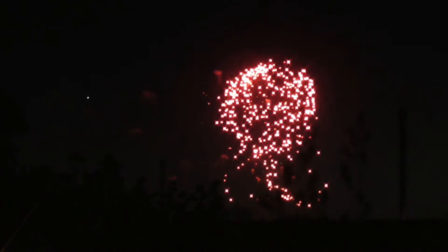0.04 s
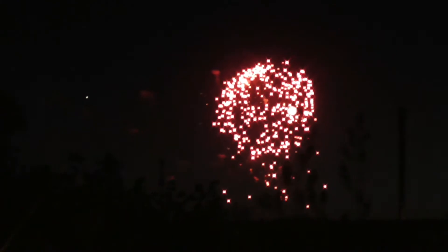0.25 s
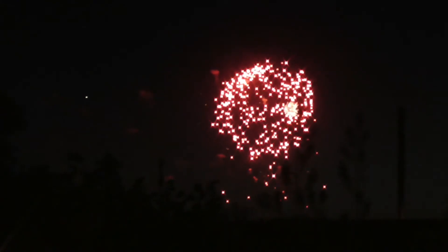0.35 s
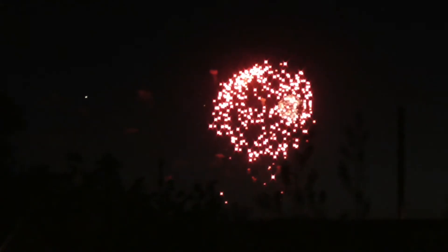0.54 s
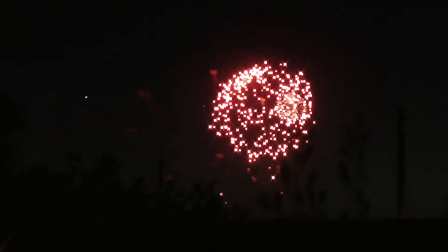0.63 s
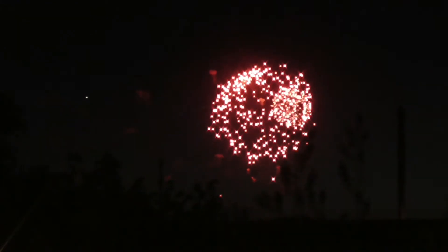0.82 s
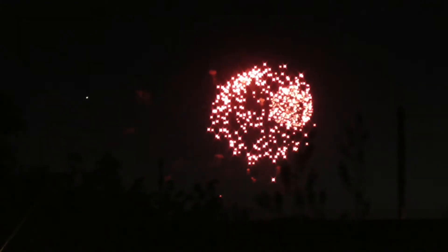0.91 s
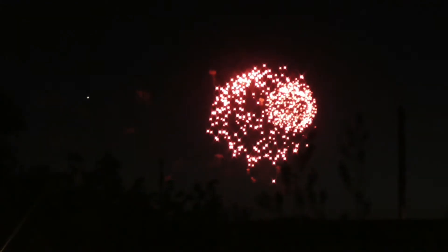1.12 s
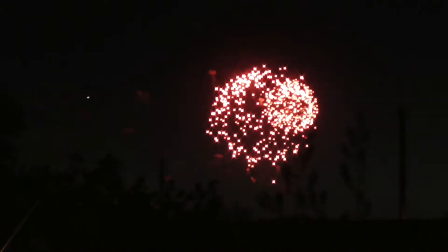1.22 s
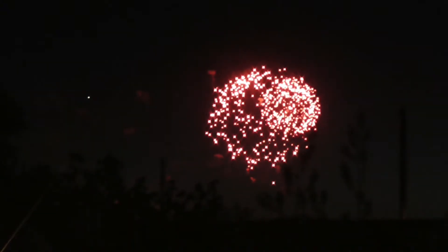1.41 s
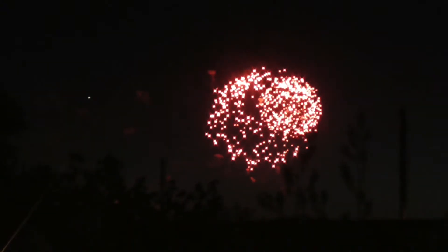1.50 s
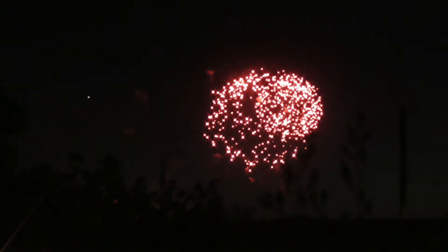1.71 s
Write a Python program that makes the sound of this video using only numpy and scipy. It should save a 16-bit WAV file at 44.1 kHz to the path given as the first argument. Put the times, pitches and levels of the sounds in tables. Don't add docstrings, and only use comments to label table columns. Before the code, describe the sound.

Firework explosion far off at night, one hard boom followed by thudding, fading low echoes

```python
import sys
import numpy as np
from scipy import signal
from scipy.fft import rfft, irfft
from scipy.io import wavfile
from scipy.ndimage import uniform_filter1d, minimum_filter1d, map_coordinates

SR = 44100
rng = np.random.default_rng(int(sys.argv[2]) if len(sys.argv) > 2 else 0)


def pcm_store(signal):
    levels = np.round(np.clip(np.atleast_2d(signal), -1, 1) * 32767)
    wavfile.write(sys.argv[1], SR, levels.astype(np.int16).T)


def voltage_ratio(decibels):
    exponent = np.asarray(decibels, float) / 20
    return 10 ** exponent


N = 77175
T = np.arange(N) / SR

# f/Hz, level/dB
HISS_SPECTRUM = [(900, -4), (1900, 4), (2800, -4.5), (3860, -4), (5600, -13.5), (7400, -7), (12900, -6),
                 (15900, -17)]
HISS_DB = -59
DUCK_DB, DUCK_BACK_S = -13, .1

# t/s, peak level/dB, f/Hz, t60/s, left over right/dB
TICKS = [
    (0.619, -34.5, 4850, 0.0048, 12),
    (.6175, -38.5, 8200, .003, 0.5),
    (.6175, -49.5, 6720, 0.01, -3),
    (.6175, -64, 3090, 0.0065, -16.5),
    (1.4668, -46, 6450, .018, 6),
    (1.4668, -56, 8800, .02, .5),
]

# t/s, level/dB, brightness/dB
ROLL_COURSE = [(0, -32.5, 1), (.15, -30.5, 2.5), (.212, -26, -2), (.236, -14.5, 3.5), (.33, -11, 0),
               (.43, -15, 1.5), (.56, -13, 1.5), (.59, -18, 3.5), (.693, -16, -0.5), (.701, -11, -2),
               (.85, -19.5, -0.5), (1.0, -19.5, -0.5), (1.1, -20, 0.0), (1.21, -25, 1), (1.3, -22.5, -2),
               (1.35, -22, 0.5), (1.43, -23.5, -1), (1.75, -29.5, 3)]
# f/Hz, level/dB
TOWN_COLOUR = [(15, -50), (30, -14), (92, -4), (220, -1), (489, -9.5), (900, -21.5), (1500, -40),
               (2200, -71.5), (3200, -84.5)]
# f/Hz, level/dB
ROLL_WIDTH = [(30, -8.5), (90, -12), (180, -11), (380, -8), (700, -7), (1300, -4), (2400, -2)]
ECHOES_PER_S, SPREAD_DB, WASH_SHARE, PATCHY_DB = 1200, 2.2, .8, 1.8

# t/s, peak level/dB, f/Hz, length/cycles, left lag/ms
FAR_PUSHES = [(.2770, 2, 254, 0.55, 0.29), (.2980, -17, 201, 1.06, -1.55), (.3190, -12, 228.7, 1.74, 0.094),
              (.3450, -3, 235, 0.96, 0.0), (.4100, -10, 236, 4.6, 0.046), (.4530, -5.5, 217, 1.6, 0.47),
              (.4600, -2.5, 99.7, 4.5, 0.14), (.5980, -3.5, 166.4, 3.53, -0.17),
              (.7000, -4.5, 450, 2.07, -0.58), (.7040, 1, 173.5, 1.45, 0.32), (.7405, -4, 202, 0.87, 0.38),
              (.7700, -17, 181, 5, 0.0), (.8950, -12.5, 184, 3.4, -0.5), (1.0450, -10.5, 219, 4.2, -0.22),
              (1.0700, -19, 73.6, 2.7, 0.0), (1.2460, -4.5, 308, 0.71, 0.72), (1.2495, -5, 202, 0.98, 0.76),
              (1.2510, -19, 850, 4.3, 0.16), (1.2560, -6, 370, 1.3, -0.23), (1.2590, -16.5, 1060, 4.6, .3),
              (1.2635, -3.5, 160, 2.5, -0.13), (1.3680, -8.5, 174, 2.6, 0.0), (1.4050, -21, 152, 5, 0.15),
              (1.3600, -19.5, 373.5, 10, -0.069)]
# t/s, peak level/dB, f/Hz, length/cycles, left lag/ms
FAR_SUCKS = [
    (1.2625, -7.5, 305, 1, 0.014),
    (1.2827, -9.5, 234, 0.77, 0.004),
]
# t/s, peak level/dB, f/Hz, length/cycles, left lag/ms
SECOND_SHOCK = [
    (.6957, .5, 380, 1.0, .2),
]
SECOND_PAN_DB, SECOND_EDGE_DB = -3, -33

# t/s, peak level/dB, f/Hz, length/cycles, left lag/ms
NEAR_PUSHES = [
    (.2243, 7.5, 300, 1.0, .9),
    (.2276, .5, 250, .75, 3.2),
    (.2324, -3, 160, 1.0, 0.0),
]
# t/s, peak level/dB, f/Hz,
# length/cycles, left lag/ms
NEAR_SUCKS = [
    (.2160, -7, 170, .75, 0.0),
    (.2235, 3, 420, .6, .2),
    (.2255, -6, 200, .6, 1.8),
]

SHOCK_S, SHOCK_DB, PUSH_MS, SHARP_DB = .2200, 8.5, 1.8, -24
FRONT_HZ = (900, 1300)
FIZZ_DB, FIZZ_T60_S, FIZZ_HZ = -36, .045, 6470
AIR_CUT_HZ, NEAR_CUT_HZ, MIC_CUT_HZ = 1300, 1500, 48
HOLD_LEVEL, HOLD_S = .95, .008
TOP, KNEE, CUTOFF_HZ = .995, 40, 16100


def coloured(x, *spectra):
    log_hz = np.log(np.maximum(np.fft.rfftfreq(N, 1 / SR), 1))
    level_db = 0
    for spectrum in spectra:
        hz, db = np.transpose(spectrum)
        level_db = level_db + np.interp(log_hz, np.log(hz), db)
    return irfft(rfft(x) * voltage_ratio(level_db), N)


def low(x, hz, order):
    return signal.sosfilt(signal.butter(order, hz, fs=SR, output="sos"), x)


def high(x, hz, order):
    return signal.sosfilt(signal.butter(order, hz, "high", fs=SR, output="sos"), x)


def smooth_split(x, hz):
    return signal.sosfiltfilt(signal.butter(2, hz, fs=SR, output="sos"), x)


def drift(rate_hz):
    knots = rng.standard_normal(200)
    return map_coordinates(knots, [T * rate_hz], order=3)


def panned(db):
    return voltage_ratio(np.array([[db / 2], [-db / 2]]))


def hiss():
    noise = coloured(rng.standard_normal((2, N)), HISS_SPECTRUM)
    age = T - SHOCK_S
    duck_db = DUCK_DB * (age > 0) * np.exp(-np.maximum(age, 0) / DUCK_BACK_S)
    return voltage_ratio(HISS_DB + duck_db) * noise / noise.std()


def ticks():
    out = np.zeros((2, N))
    for s, db, hz, t60, pan_db in TICKS:
        age = np.maximum(T - s, 0)
        onset = np.minimum(age / .0006, 1)
        ring = np.sin(2 * np.pi * hz * age) * voltage_ratio(db - 60 * age / t60) * onset
        out += ring * panned(pan_db)
    return out


def roll():
    s, level_db, bright_db = np.transpose(ROLL_COURSE)
    level_db = np.interp(T, s, level_db)
    bright_db = np.interp(T, s, bright_db)
    sizes = voltage_ratio(SPREAD_DB * np.minimum(rng.exponential(1, (2, N)), 4))
    signs = rng.choice([-1, 1], (2, N))
    echoes = sizes * signs * (rng.random((2, N)) < ECHOES_PER_S / SR)
    mix = echoes / echoes.std() + WASH_SHARE * rng.standard_normal((2, N))
    mid = coloured(mix[0], TOWN_COLOUR)
    side = coloured(mix[1], TOWN_COLOUR, ROLL_WIDTH)
    both = (mid + side * [[1], [-1]]) / mid.std()
    below_130 = smooth_split(both, 130.0)
    below_450 = smooth_split(both, 450.0)
    bass = below_130 * voltage_ratio(PATCHY_DB * drift(6.9) - bright_db)
    middle = (below_450 - below_130) * voltage_ratio(PATCHY_DB * drift(9.5))
    treble = (both - below_450) * voltage_ratio(PATCHY_DB * drift(20.57) + bright_db)
    return voltage_ratio(level_db) * (bass + middle + treble)


def thuds(rows, pan_db=0):
    out = np.zeros((2, N))
    for s, db, hz, cycles, lag_ms in rows:
        arrival = s + np.array([[lag_ms / 1000], [0]])
        turns = (T - arrival) * hz
        swell = np.sin(np.pi * np.clip(turns / cycles, 0, 1)) ** .8
        out += voltage_ratio(db) * swell * np.sin(2 * np.pi * turns)
    return out * panned(pan_db)


def far_echoes():
    far_thuds = low(thuds(FAR_PUSHES) - thuds(FAR_SUCKS), AIR_CUT_HZ, order=6)
    return high(far_thuds + roll(), MIC_CUT_HZ, order=3)


def blast(s, db):
    u = np.maximum(T - s, 0) * 1000 / PUSH_MS
    return voltage_ratio(db) * (u > 0) * (1 - u) * np.exp(-u)


def second_shock():
    edge = low(blast(SECOND_SHOCK[0][0] + 0.0012, SECOND_EDGE_DB), 5000.0, order=1)
    edge = edge * voltage_ratio(np.array([[SECOND_PAN_DB], [0]]))
    return low(thuds(SECOND_SHOCK, SECOND_PAN_DB), AIR_CUT_HZ, order=6) + edge


def held(x):
    size = int(HOLD_S * SR)
    peak = abs(x).max(axis=0)
    gain = minimum_filter1d(HOLD_LEVEL / np.maximum(peak, HOLD_LEVEL), size=2 * size)
    gain = uniform_filter1d(uniform_filter1d(gain, size=size), size=size)
    return x * gain


def near_walls():
    return low(thuds(NEAR_PUSHES) - thuds(NEAR_SUCKS), NEAR_CUT_HZ, order=3)


def shock():
    wave = blast(SHOCK_S, SHOCK_DB)
    front = np.array([low(wave, hz, order=2) for hz in FRONT_HZ])
    edge = blast(SHOCK_S + .00015, SHOCK_DB + SHARP_DB)
    age = T - SHOCK_S
    fizz = high(rng.standard_normal((2, N)), FIZZ_HZ, order=2)
    fizz = fizz * (age > 0) * voltage_ratio(FIZZ_DB - 60 * np.maximum(age, 0) / FIZZ_T60_S)
    return front + edge + fizz


def scene():
    steady = held(far_echoes() + second_shock()) + ticks() + hiss()
    return steady + near_walls() + shock()


def roll_off(x):
    return signal.sosfilt(signal.butter(12, 15900, fs=SR, output="sos"), x)


def record(dry):
    clipped = dry / (1 + abs(dry / TOP) ** KNEE) ** (1 / KNEE)
    mix = signal.sosfilt(signal.cheby2(22, 50, CUTOFF_HZ, fs=SR, output="sos"), clipped)
    return roll_off(mix)


dry = scene()
out = record(dry)
pcm_store(out)
```